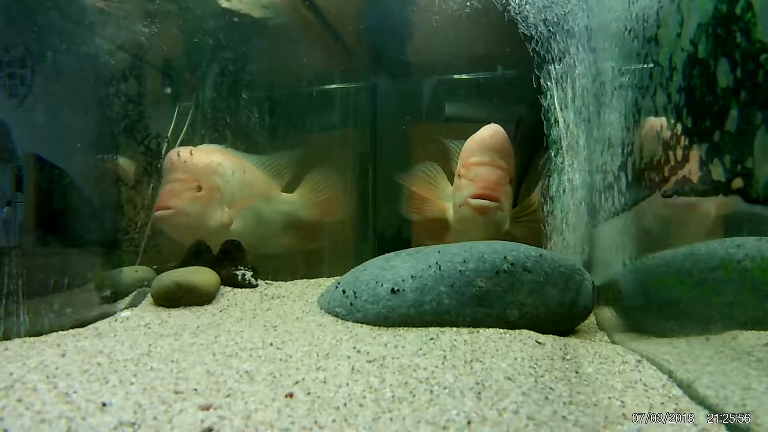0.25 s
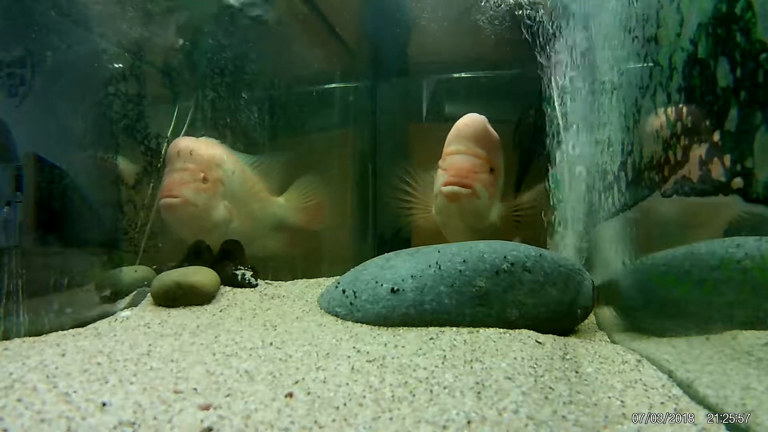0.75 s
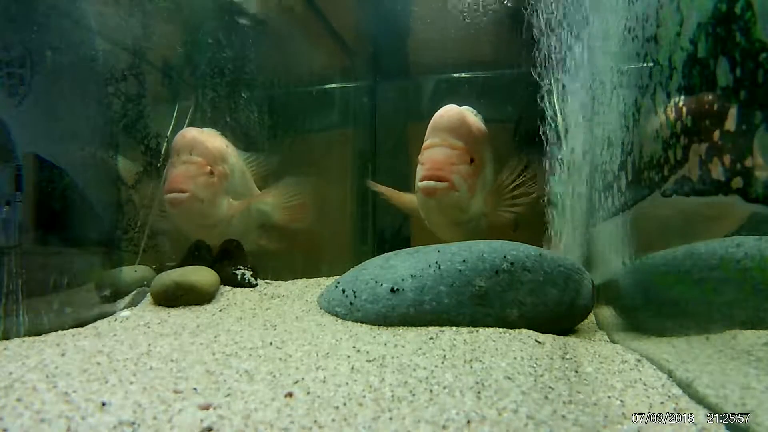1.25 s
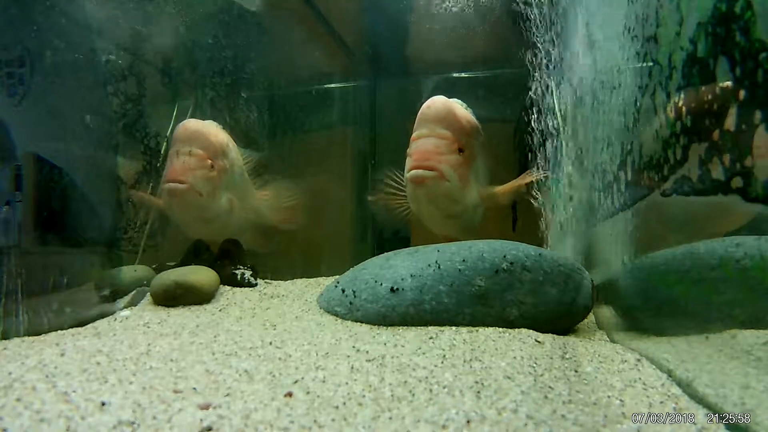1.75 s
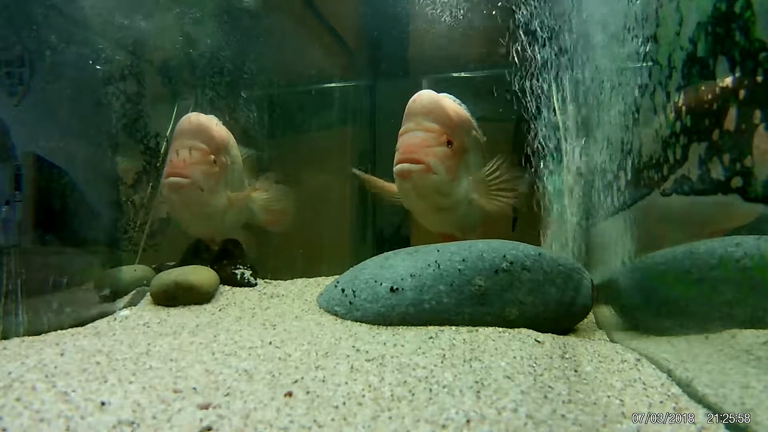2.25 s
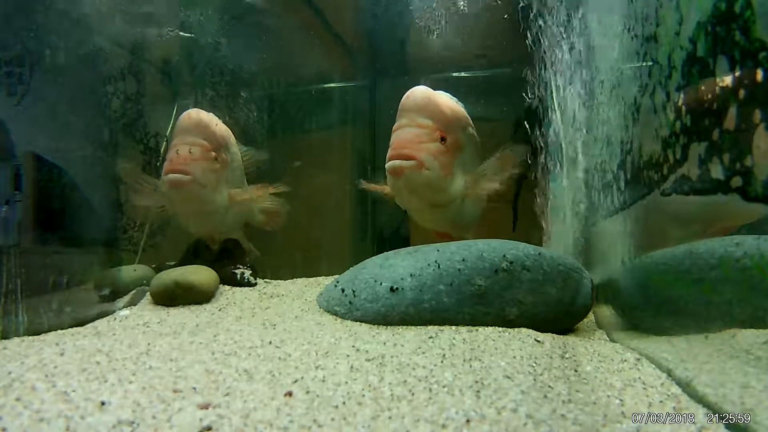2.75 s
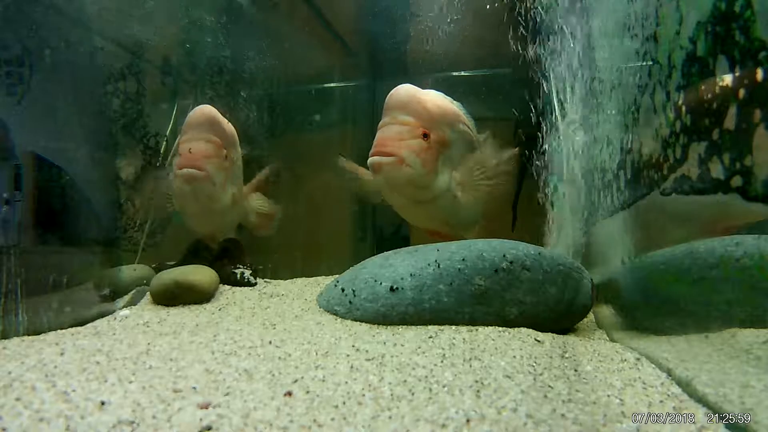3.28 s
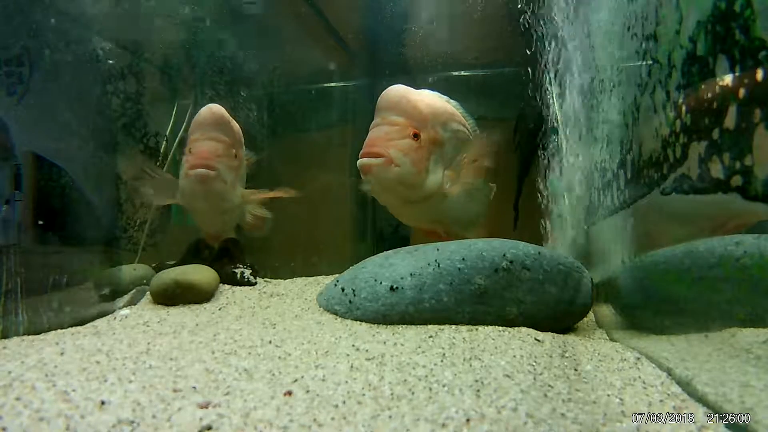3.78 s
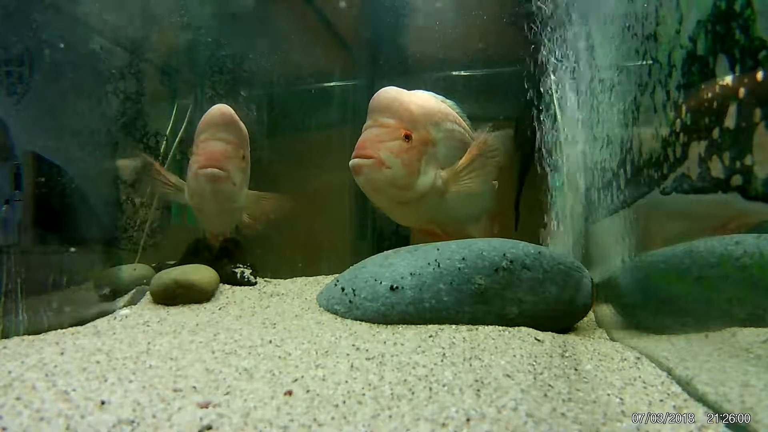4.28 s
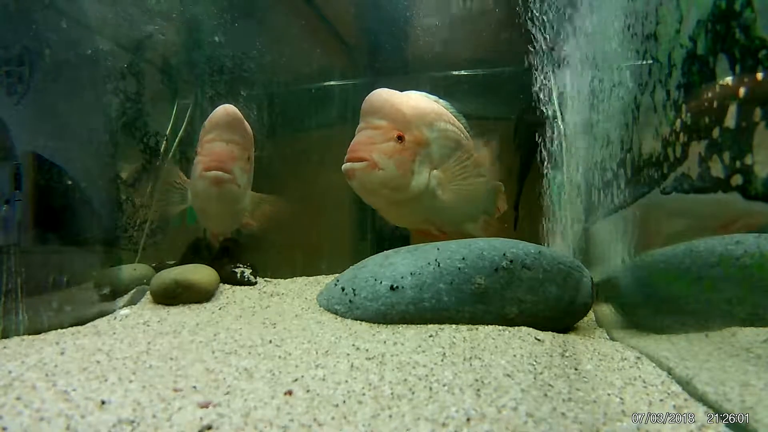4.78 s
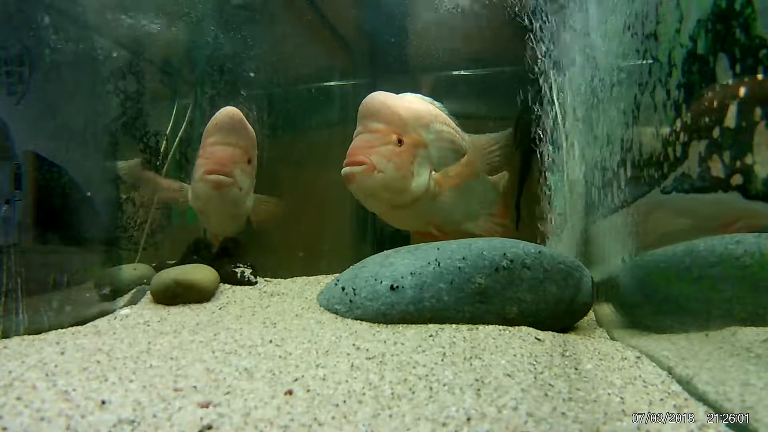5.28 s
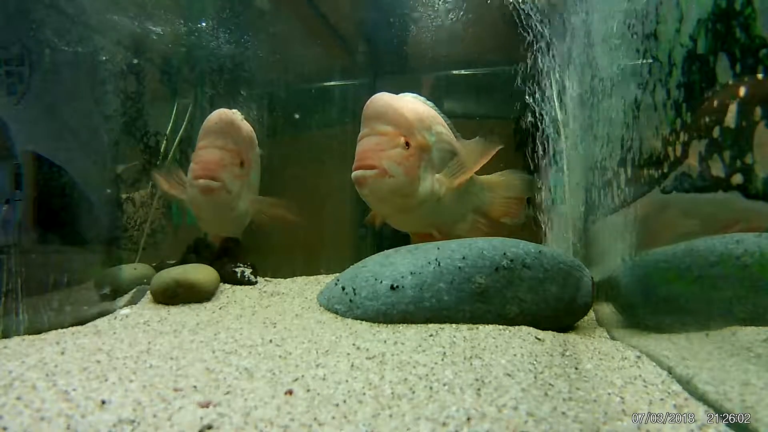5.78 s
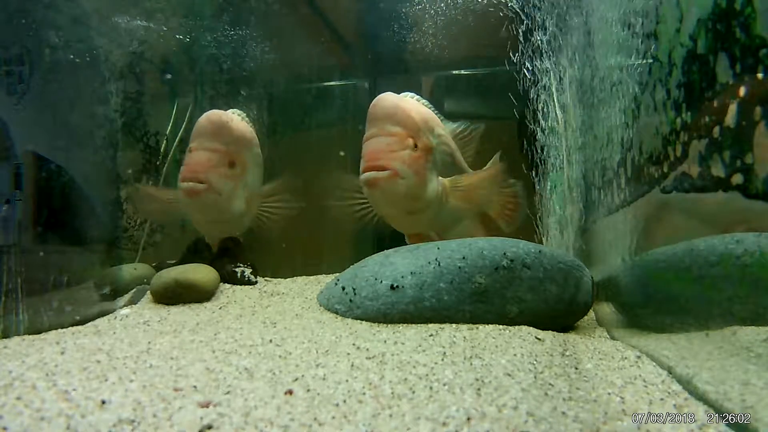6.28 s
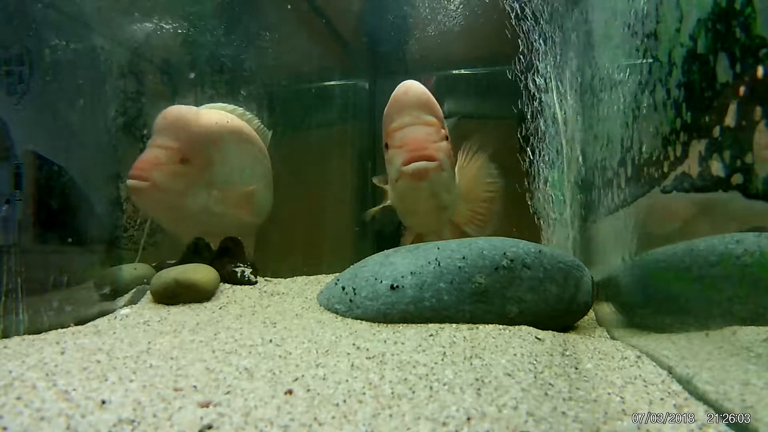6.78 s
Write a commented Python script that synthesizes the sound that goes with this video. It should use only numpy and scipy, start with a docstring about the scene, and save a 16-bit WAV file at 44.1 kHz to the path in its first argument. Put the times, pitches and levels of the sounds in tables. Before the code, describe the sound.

Close, constant low electric buzz of an aquarium pump, with bubbling water rushing, softly ringing and faintly fizzing above it.

```python
"""A home fish tank heard from close by: a mains-driven air pump hums and feeds a column of bubbles.
The pump is a sum of mains harmonics; the water is swarms of short rising pings, filtered by resonances.
Large bubbles gurgle low in the tank, small ones burst in a dense rush, like-sized ones form a wandering ring.
A fine spray fizzes above, five stray droplets tick, and room rumble and microphone hiss lie underneath."""
import sys
import numpy as np
from scipy import signal
from scipy.fft import rfft, irfft, next_fast_len
from scipy.io import wavfile
from scipy.ndimage import uniform_filter1d, map_coordinates

SR = 44100
rng = np.random.default_rng(int(sys.argv[2]) if len(sys.argv) > 2 else 0)


def persist_wave(psi):
    """Save psi, clipped to +-1, as 16-bit WAV."""
    counts = np.round(np.clip(psi, -1, 1) * 32767).astype(np.int16)
    wavfile.write(sys.argv[1], SR, np.atleast_2d(counts).T)


N = 310464
MAINS_HZ = 49.96


def amp(db):
    """Decibels to gain."""
    return 10 ** (np.asarray(db) / 20)


def unit(x):
    """Scale to rms 1."""
    return x / np.sqrt(np.mean(x ** 2) + 1e-20)


def curves(rows):
    """Interpolate each column after start_s to one value per sample."""
    start_s, *columns = np.transpose(rows)
    t = np.arange(N) / SR
    return [np.interp(t, start_s, column) for column in columns]


def wobble(knots_per_s):
    """Smooth random curve through normally distributed knots."""
    knots = rng.standard_normal(int(N * knots_per_s / SR) + 4)
    return map_coordinates(knots, [np.arange(N) * knots_per_s / SR], mode="nearest")


def filtered(x, response):
    """Multiply the spectrum of x by a response of frequency."""
    size = next_fast_len(len(x) + SR // 2)
    spectrum = rfft(x, size) * response(np.fft.rfftfreq(size, 1 / SR))
    return irfft(spectrum, size)[:len(x)]


def resonate(x, modes):
    """Ring x through steep-sided resonances; flat input of rms 1 comes out at their dB per Hz."""
    size = 2 ** 14
    hz = np.fft.rfftfreq(size, 1 / SR)
    power = sum(amp(db) ** 2 / (1 + (2 * (hz - centre) / width) ** 2) ** 2 for centre, width, db in modes)
    cepstrum = irfft(np.log(power * SR / 2 + 1e-20) / 2)
    # minimum phase: the ringing follows each bubble
    cepstrum[1:size // 2] *= 2
    cepstrum[size // 2 + 1:] = 0
    impulse = irfft(np.exp(rfft(cepstrum)))
    return signal.fftconvolve(x, impulse)[:len(x)]


def bubbles(per_second, low_hz, high_hz, cycles, rise, scatter_db):
    """Swarm of short rising pings of random size, with even energy per Hz and rms 1."""
    total = int(per_second * N / SR)
    start, place, size = rng.random((total, 3)).T
    hz = (low_hz + (high_hz - low_hz) * place)[:, None].astype(np.float32)
    life_s = cycles / hz
    # the second limit bounds memory
    length = min(int(4 * life_s.max() * SR), 3000000 // total)
    t = np.arange(length, dtype=np.float32) / SR
    # most bubbles are faint, a few stand out
    gain = amp(-scatter_db * np.log(1 - size * .995))[:, None] / np.sqrt(life_s)
    fade = np.exp(-t / life_s)
    # a bubble's pitch climbs as it nears the surface
    phase = 2 * np.pi * hz * (t + rise * (t - life_s * (1 - fade)))
    pings = gain * (fade * np.sin(phase))
    index = (start * N).astype(int)[:, None] + np.arange(length)
    return unit(np.bincount(index.ravel(), pings.ravel(), N)[:N])


def enclosed(x, t60_s, direct):
    """Reflections between water, glass and lid blur each ping; direct weighs the first arrival."""
    t = np.arange(SR // 3) / SR
    echoes = rng.standard_normal(len(t)) * amp(-60 * t / t60_s)
    echoes /= np.linalg.norm(echoes)
    # scatter the phase, keep the colour even
    scatter = direct + rfft(echoes, N)
    return irfft(rfft(x) * scatter / np.abs(scatter), N)


def drift(x, depth_db, width_bins, length_frames):
    """Narrow peaks and dips in the colour come and go slowly."""
    spectrum = signal.stft(x, nperseg=1024)[2]
    field = rng.standard_normal(spectrum.shape)
    for _ in range(2):
        field = uniform_filter1d(field, width_bins, axis=0)
        field = uniform_filter1d(field, length_frames, axis=1)
    return signal.istft(spectrum * amp(depth_db * unit(field)), nperseg=1024)[1][:N]


# pump partials except the fundamental, before level changes: mains_multiple, level_db (rms)
HUM_PARTIALS = [(1, -60.5), (4, -45), (6, -34.5), (7, -56), (8, -37), (10, -49), (12, -45.4), (16, -58.5)]
# fundamental at twice the mains frequency, before waver: start_s, level_db (rms)
DRONE_LEVEL = [(0, -33), (1.25, -36.5), (2.1, -32), (2.75, -31), (4.2, -34.5), (5.4, -42), (5.8, -36.5),
               (7.04, -36)]
OCTAVE_ENTERS_S, OCTAVE_RISE_S, OCTAVE_MUTED_DB = 1.82, 0.45, -11
SEESAW_PERIOD_S, SEESAW_PEAK_S, SEESAW_DB = 6.2, 4.2, 0.85


def pump(first_kick_s=0.004204, housing_hz=340, housing_width_hz=160, waver_db=0.08, jitter_rad=0.015):
    """The armature kicks twice per mains cycle; the housing delays each partial around its resonance."""
    t = np.arange(N) / SR
    turn = 2 * np.pi * MAINS_HZ * (t - first_kick_s) + jitter_rad * wobble(3)
    drone_db, = curves(DRONE_LEVEL)
    muted = 1 - np.clip((t - OCTAVE_ENTERS_S) / OCTAVE_RISE_S, 0, 1)
    seesaw_db = SEESAW_DB * np.cos(2 * np.pi * (t - SEESAW_PEAK_S) / SEESAW_PERIOD_S)
    # the octave sets in late; multiples 6 and 8 trade strength
    change_db = {4: OCTAVE_MUTED_DB * muted, 6: seesaw_db, 8: -seesaw_db}
    hum = np.zeros(N)
    for order, db in [(2, drone_db), *HUM_PARTIALS]:
        order = round(order)
        hz = order * MAINS_HZ
        lag_rad = np.arctan2(hz * housing_width_hz, housing_hz ** 2 - hz ** 2)
        level_db = db + change_db.get(order, 0) + waver_db * wobble(4)
        hum += np.sqrt(2) * amp(level_db) * np.cos(order * turn - lag_rad)
    return hum


# low resonances of tank and water, before GURGLE_GAIN_DB: centre_hz, width_hz, level_db (per Hz)
TANK_MODES = [(71.6, 12, -59.5), (87.5, 50, -71), (158.2, 29, -59), (250.7, 36, -65), (332.6, 55, -61),
              (432, 114, -64), (516, 40, -70), (633.3, 90, -65.5), (725, 110, -70.5), (824.4, 70, -73.5)]
GURGLE_GAIN_DB = -13.2


def gurgle():
    """Large bubbles leave the air stone and shake the water in the tank."""
    swarm = bubbles(per_second=600, low_hz=54.3, high_hz=943, cycles=1.9, rise=.12, scatter_db=1.53)
    # air arrives in puffs at the rate of the pump's kicks
    puffs = 1 + 0.038 * np.cos(2 * np.pi * 2 * MAINS_HZ * np.arange(N) / SR)
    blurred = enclosed(swarm, t60_s=.1, direct=.8)
    return amp(GURGLE_GAIN_DB) * resonate(blurred * puffs, TANK_MODES)


# resonances of the air over the water, before BURSTING_GAIN_DB: centre_hz, width_hz, level_db (per Hz)
HOOD_MODES = [(970, 79, -80.5), (1303, 320, -73), (1502, 165, -71), (1672, 192, -75), (1878, 177, -77),
              (2208, 443, -84), (2510, 120, -93.5), (2778, 255, -86), (3220, 460, -95), (3865, 770, -97),
              (4180, 200, -99)]
BURSTING_GAIN_DB = -7.5


def bursting():
    """Small bubbles burst in a dense patter that rings under the hood."""
    swarm = bubbles(per_second=2800, low_hz=844, high_hz=4477, cycles=3.5, rise=.08, scatter_db=1.5)
    rush = resonate(enclosed(swarm, t60_s=.12, direct=0.41), HOOD_MODES)
    return amp(BURSTING_GAIN_DB) * drift(rush, depth_db=0.5, width_bins=3, length_frames=40)


# wandering ring in the surface rush: start_s, centre_hz, level_db (rms)
RING_PATH = [(0, 1425, -54.5), (.8, 1537, -47.5), (1.35, 1540, -51.5), (1.9, 1642, -49),
             (2.45, 1504, -60.5), (3, 1386, -51), (3.9, 1358, -53.5), (4.5, 1485, -55), (7.04, 1540, -50.5)]


def ring(width_hz=55):
    """Bubbles of like size sound together as one narrow, wandering ring."""
    centre_hz, level_db = curves(RING_PATH)
    mean_hz = centre_hz.mean()
    swarm = bubbles(per_second=540, low_hz=1300, high_hz=1689, cycles=10, rise=0.021, scatter_db=0.4)
    band = signal.hilbert(resonate(swarm, [(mean_hz, width_hz, 0)]))
    # frequency shift from the mean to the moving centre
    glide = np.exp(2j * np.pi * np.cumsum(centre_hz - mean_hz) / SR)
    return amp(level_db) * unit((band * glide).real)


# bright resonances, before the spray gain: centre_hz, width_hz, level_db (per Hz)
SPRAY_MODES = [(4850, 330, -110), (5300, 361, -106), (5650, 580, -108), (6378, 330, -115),
               (6799, 1100, -118)]
# spray gain over time: start_s, gain_db
SPRAY_GAIN = [(0, -9.8), (3.4, -7), (7.04, -7.5)]


def spray():
    """The tiniest bubbles excite bright resonances in a faint fizz."""
    gain_db, = curves(SPRAY_GAIN)
    swarm = bubbles(per_second=3000, low_hz=4200, high_hz=7600, cycles=6, rise=.05, scatter_db=0.5)
    return amp(gain_db) * resonate(enclosed(swarm, t60_s=.07, direct=.8), SPRAY_MODES)


# room rumble and microphone hiss: frequency_hz, level_db (per Hz)
FLOOR_SPECTRUM = [(10, -100), (30, -78), (55, -80.5), (120, -79.5), (900, -88), (3000, -115), (7500, -123),
                  (12000, -123), (15700, -119.5)]


def floor():
    """Quiet room rumble and microphone hiss: white noise shaped by a spectrum."""
    table_hz, table_db = np.transpose(FLOOR_SPECTRUM)

    def response(hz):
        level_db = np.interp(np.log(hz + 1), np.log(table_hz), table_db)
        return np.sqrt(SR / 2) * amp(level_db)

    return filtered(rng.standard_normal(N), response)


# stray droplets: start_s, pitch_hz (middle of the cluster), level_db (peak)
DROPLETS = [(.465, 6600, -69), (.654, 9400, -70.5), (.937, 5670, -65), (1.836, 4700, -61),
            (3.664, 5000, -55.5)]


def droplets(t60_s=0.05, attack_s=.0008, spread=0.08):
    """Each droplet ticks with a small cluster of quickly dying tones."""
    out = np.zeros(N + SR)
    t = np.arange(SR // 10) / SR
    envelope = amp(-60 * t / t60_s) * (1 - np.exp(-t / attack_s))
    for start_s, pitch_hz, level_db in DROPLETS:
        tones_hz = pitch_hz * np.exp(spread * rng.standard_normal(size=(8, 1)))
        tick = np.sin(2 * np.pi * tones_hz * t).sum(0) * envelope
        out[round(start_s * SR):][:len(t)] += amp(level_db) * tick / np.abs(tick).max()
    return out[:N]


def scene():
    """Pump, water and room at one microphone."""
    water = gurgle() + bursting() + ring() + spray() + droplets()
    return (pump() + water + floor())[None]


def record(dry, top_hz=15750):
    """Fade both ends over 1 ms against clicks, then remove everything from top_hz up."""
    samples = np.arange(N)
    soft_ends = np.clip(np.minimum(samples, samples[::-1]) / 44, 0, 1)
    return np.array([filtered(channel * soft_ends, lambda hz: hz < top_hz) for channel in dry])


dry = scene()
out = record(dry)
persist_wave(out)
```